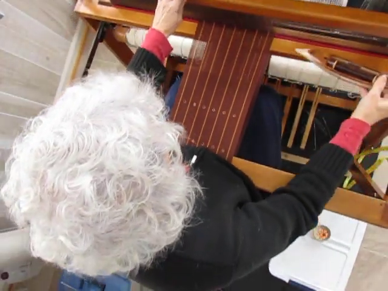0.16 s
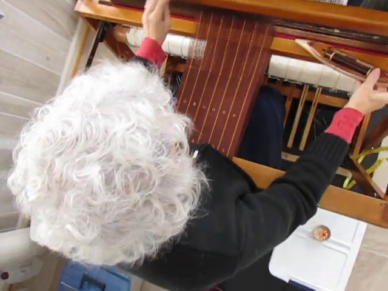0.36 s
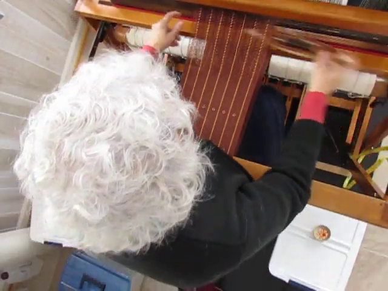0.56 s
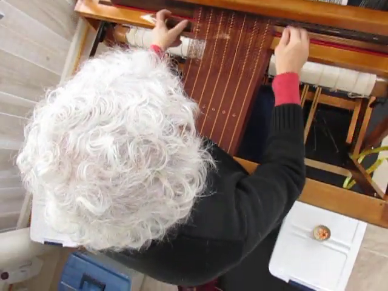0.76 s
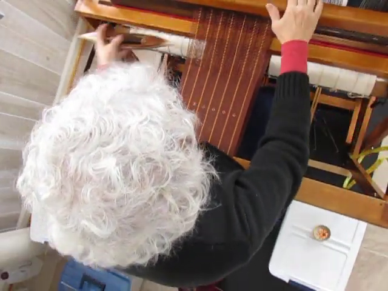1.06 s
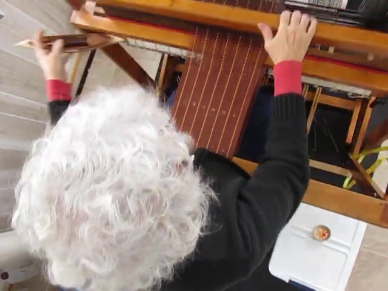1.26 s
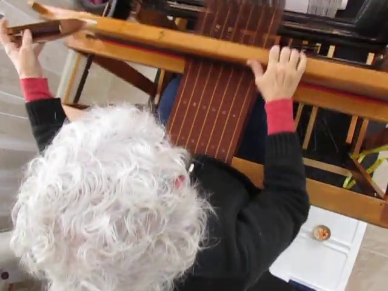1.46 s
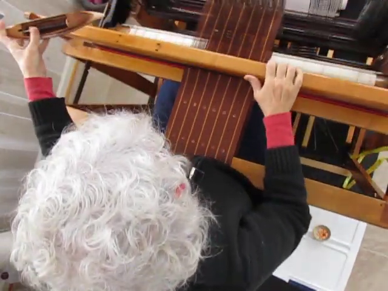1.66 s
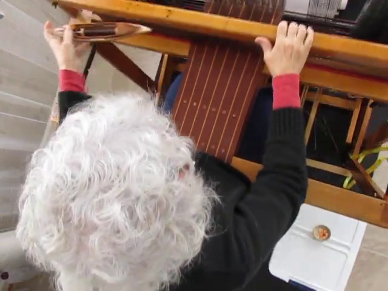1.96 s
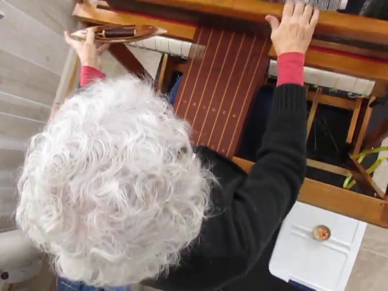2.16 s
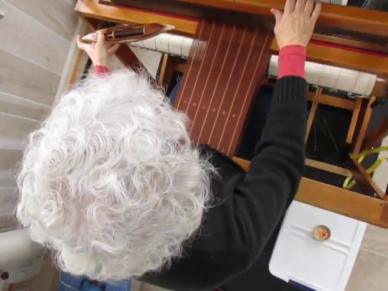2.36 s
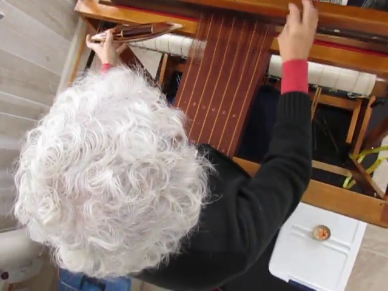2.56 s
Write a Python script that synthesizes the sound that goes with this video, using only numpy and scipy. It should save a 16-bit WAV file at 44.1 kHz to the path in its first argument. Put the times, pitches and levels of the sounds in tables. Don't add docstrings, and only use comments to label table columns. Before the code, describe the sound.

A wooden hand loom, close in stereo, in a small furnished room. Soft rubbing and light clacks at 0.2-0.3 s; the shuttle strikes sharply at 0.48 and its bobbin rattles until 0.8, moving right to left. After a brief lull, hard bright knocks at 1.07-1.45. Thuds and thread hiss around 1.5-1.9, scattered clacks, then loud shaft clatter at 2.3-2.4 with a thin high squeal until 2.6.

```python
import sys
import numpy as np
from scipy import signal
from scipy.fft import rfft, irfft
from scipy.io import wavfile
from scipy.ndimage import uniform_filter1d

SR = 44100
rng = np.random.default_rng(int(sys.argv[2]) if len(sys.argv) > 2 else 0)


def log_audio(samples):
    frames = np.atleast_2d(samples).T
    limited = np.clip(frames, -1, 1)
    pcm = np.round(limited * 32767).astype(np.int16)
    wavfile.write(sys.argv[1], SR, pcm)


def gain_from_db(level_db):
    decades = np.asarray(level_db, float) / 20
    return 10 ** decades


N = 119070
RING = 8000

# f/Hz, likeness (1 = identical)
LIKENESS = [(60, 0.88), (300, 0.92), (2000, 0.18), (8000, 0.018)]
# t/s, peak level/dB, tilt/(dB per octave), favoured f/Hz
BOBBIN_KNOCKS = [(0.511, -15, -8.5, 4410), (.6590, -12, -5, 8040), (0.67, -7.5, -6.5, 5560),
                 (.6770, -7.5, -1, 8300), (0.7055, -11, -15, 1850), (0.7081, -6.5, 1.5, 11800),
                 (0.712, -4.5, 3.5, 5800), (0.72, -12.5, -1.5, 2700), (0.7469, -8.5, 8.5, 6010),
                 (0.749, -10.5, 0, 2400), (0.7733, -12.5, 0.5, 2660), (.7820, -13, 3.5, 6100),
                 (1.0972, -11, 1, 3520), (1.1100, -16, -2, 8400), (1.1160, -11, 1, 4940),
                 (1.139, -7, -6.5, 2420), (1.1490, -25, -4.5, 2400), (1.1950, -13.5, -0.5, 4960),
                 (1.2060, -13, -1.5, 2340), (1.2420, -18.5, -7, 2360), (1.262, -17.5, 1.5, 5100),
                 (1.3295, -13, 2, 3400), (1.333, -11.5, 7, 4900), (1.3410, -13, -5, 2480),
                 (1.348, -11.5, 0, 5030), (1.358, -14, -3, 3360), (1.368, -16, -0.5, 3450)]
# t/s, peak level/dB, tilt/(dB per octave), favoured f/Hz
BOAT_STRIKES = [
    (0.4838, -4.5, -11.5, 2500),
    (1.0590, -31.5, -5, 2510),
    (1.065, -29.5, -8, 3000),
    (1.0741, -5, -5, 3660),
    (1.1338, -6.5, -8, 2500),
    (1.1658, -4.5, -2, 2410),
    (1.268, -12.5, -6, 2700),
    (1.3060, -8.5, -5, 2640),
    (1.4372, -11.5, -14, 2760),
]


def evened(x):
    return x / np.sqrt(np.mean(x ** 2) + 1e-20)


def read(points, hz):
    f, value = np.transpose(points)
    return np.interp(np.log(hz + 1), np.log(f + 1), value)


def curve(points, axis=1):
    p = np.array(points)
    return np.interp(np.arange(N) / SR, p[:, 0], p[:, axis])


def add(mix, s, sound):
    part = mix[..., round(s * SR):][..., :sound.shape[-1]]
    part += sound[..., :part.shape[-1]]


def second_side(left, other, hz):
    same = np.clip(read(LIKENESS, hz), -1, 1)
    same = same.reshape(-1, *[1] * (left.ndim - 1))
    return same * left + np.sqrt(1 - same ** 2) * other


def wobble(rate_hz):
    b, a = signal.butter(2, rate_hz, fs=SR)
    drift = signal.lfilter(b, a, rng.standard_normal(N + SR))[SR:]
    return 2 * np.tanh(0.5 * evened(drift))


def hiss(colour, patchy_db, grain_db, grains_per_s):
    size = 4096 if colour[-1][0] < 400 else 512
    frames, hz = N // (size // 4) + 5, np.fft.rfftfreq(size, 1 / SR)
    a, b, c, d, patches = rng.standard_normal((frames, len(hz), 5)).T
    patches = uniform_filter1d(patches, size=10, axis=0)
    patches = evened(uniform_filter1d(patches, size=8, axis=1))
    left = a + 1j * b
    z = np.array([left, second_side(left, c + 1j * d, hz)])
    above = np.maximum(hz / colour[-1][0], 1)
    below = np.maximum(colour[0][0] / (hz + 1), 1)
    shape = read(colour, hz) - 12 * np.log2(above * below)
    z *= gain_from_db(shape[:, None] + patchy_db * patches)
    x = signal.istft(z, nperseg=size, noverlap=size * 3 // 4)[1][:, :N]
    return evened(x * gain_from_db(grain_db * wobble(grains_per_s)))


def room_tone():
    # f/Hz, level/dB
    hush_colour = [(145, 5.5), (200, -18.5), (1200, -22.5), (15000, -26.5)]
    return gain_from_db(-54) * hiss(hush_colour, patchy_db=1.2, grain_db=0.6, grains_per_s=30)


def reed():
    # t/s, level/dB
    slide = [(0, -35), (.12, -34), (.19, -39), (.4, -44.5), (.45, -31.5), (.64, -43.5), (.85, -80),
             (1.06, -64), (1.2, -36), (1.5, -34), (1.6, -17.5), (1.69, -29), (1.78, -23), (1.87, -38.5),
             (1.96, -27.5), (2.03, -36.5), (2.07, -30.5), (2.5, -44)]
    # f/Hz, level/dB
    slide_colour = [(1500, -16), (4500, -11.5), (11000, -3), (16000, -11.5)]
    sound = hiss(slide_colour, patchy_db=2.5, grain_db=1.0, grains_per_s=210)
    return gain_from_db([[1], [-1]]) * gain_from_db(curve(slide)) * sound


def cords():
    # t/s, level/dB
    rubbing = [(0, -42.5), (.19, -51), (.23, -31), (.41, -44), (.8, -36.5), (.95, -55.5), (1.06, -72),
               (1.1, -49.5), (1.6, -31), (1.9, -45), (2, -32.5), (2.25, -45.5), (2.36, -28), (2.55, -45.5)]
    # f/Hz, level/dB
    rub_colour = [(600, -1.5), (1500, 2), (6500, -7.5)]
    return gain_from_db(curve(rubbing)) * hiss(rub_colour, patchy_db=2.5, grain_db=2.5, grains_per_s=110)


def floor():
    # t/s, level/dB
    weight_on = [(0, -44.5), (.19, -46.5), (.27, -35), (.41, -41.5), (.48, -37.5), (.62, -46), (.69, -36.5),
                 (.8, -54), (.88, -58.5), (1.35, -49.5), (1.6, -30), (1.9, -48.5), (1.97, -37.5),
                 (2.24, -41), (2.31, -32.5), (2.5, -48.5)]
    # f/Hz, level/dB
    floor_colour = [(30, -1.5), (70, -2), (140, -6.5), (190, -17), (340, -11.5)]
    return gain_from_db(curve(weight_on)) * hiss(floor_colour, patchy_db=1.5, grain_db=2.5, grains_per_s=16.5)


def squeaks():
    # start t/s, length/s, level/dB, f/Hz
    whistles = [(0.033, 0.052, -47.5, 2090), (1.581, .03, -30.5, 5380), (1.584, 0.094, -30.5, 4630),
                (1.664, .03, -33, 4550), (.512, 0.052, -38, 13400), (.612, 0.051, -41, 10750),
                (1.66, 0.019, -34, 6800), (1.703, 0.072, -39, 7350), (2.056, 0.037, -28.5, 8750),
                (2.212, 0.035, -36, 3730), (2.217, 0.049, -33, 7480), (2.466, 0.09, -32, 8400),
                (2.608, 0.043, -38.5, 10140)]
    # t/s, f/Hz, level/dB
    squeal = [
        (2.295, 8549, -31),
        (2.36, 8480, -25.5),
        (2.425, 8630, -27),
        (2.452, 8580, -23),
        (2.47, 8630, -29.5),
        (2.6, 8780, -65),
    ]
    out, t = np.zeros(N), np.arange(N) / SR
    for s, length, db, hz in whistles:
        u = np.clip((t - s) / length, 0, 1)
        swell = np.sin(np.pi * u ** 0.27) ** 2.0
        turns = np.cumsum(hz + 60 * wobble(126)) / SR
        out += gain_from_db(db + 9.1 * wobble(105)) * swell * np.sin(2 * np.pi * turns)
    on = uniform_filter1d(1.0 * ((t > squeal[0][0]) & (t < squeal[-1][0])), size=400)
    turns = np.cumsum(curve(squeal) + 25 * wobble(54)) / SR
    level_db = curve(squeal, axis=2) + 3 * wobble(86) - 0.5
    out += on * gain_from_db(level_db) * np.sin(2 * np.pi * turns)
    return out * gain_from_db([[1.5], [-1.5]])


def knock(modes, chatter_s, colour, ring_s, puff_s, bounce, tick_db, puff_db):
    t, hz = np.arange(RING) / SR, np.fft.rfftfreq(2 * RING, 1 / SR)
    f, db = np.transpose(modes * 4)[:, :, None]
    luck = rng.standard_normal((2, len(f), 1))
    fade_db = 60 * t / ring_s * (f / 1000) ** 0.2
    ring = gain_from_db(db + 2 * luck[0] - fade_db) * np.sin(2 * np.pi * f * (1 + 0.013 * luck[1]) * t)
    ring = ring.reshape(2, -1, RING).sum(1)
    ring = ring + gain_from_db(puff_db - 60 * t / puff_s) * rng.standard_normal((2, RING))
    left, other = rfft(ring, 2 * RING)
    pair = np.array([left, second_side(left, other, hz)]) + gain_from_db(tick_db)
    u = t / max(chatter_s, 1e-4)
    blow = rng.standard_normal(RING) * (rng.random(RING) < 0.05) * u * np.exp(-u) * bounce
    blow[0] = 1
    log_gain = np.log(gain_from_db(np.maximum(colour(hz + 20), -80)))
    mirrored = np.r_[log_gain, log_gain[-2:0:-1]]
    causal = np.exp(np.conj(signal.hilbert(mirrored)))[:RING + 1]
    x = irfft(pair * rfft(blow, 2 * RING) * causal)[:, :RING]
    return x / abs(x.mean(0)).max()


def frame():
    # t/s, peak level/dB, tilt/(dB per octave)
    thuds = [(0.038, -29, -9), (0.429, -33, 0.5), (0.436, -21.5, -5), (.445, -27.5, -0.5), (0.468, -56, 3),
             (0.666, -20, 5.5), (1.281, -25, -13.5), (1.411, -19, -0.5), (1.522, -15.5, -1),
             (1.547, -20, -1), (1.602, -25, 2.5), (1.65, -26, -6), (1.731, -29, -1.5), (1.954, -28.5, -7),
             (2.179, -35, -4.5), (2.285, -44, 5), (2.687, -25.5, -5)]
    # f/Hz, level/dB
    timber = [(290, 11.5), (350, 3), (515, 9.5), (800, 8), (1070, -3.5)]
    out = np.zeros((2, N))
    for s, db, tilt_db in thuds:
        def colour(hz):
            tilt = tilt_db * np.log2(np.maximum(hz / 300, 1))
            soft = 18 * np.maximum(np.log2(hz / 1700), 0)
            return tilt - soft - 40 * np.maximum(np.log2(275 / hz), 0)
        blow = knock(timber, 0.016, colour, 0.029, 0.035, 0.62, tick_db=-24, puff_db=35.0)
        add(out, s, gain_from_db([[db + 0.51], [db - 0.8]]) * blow)
    return out


def shafts():
    # t/s, peak level/dB, centre f/Hz
    clacks = [(0.212, -13, 6000), (.288, -21.5, 4900), (1.469, -12, 10650), (1.755, -14.5, 4846),
              (1.775, -41, 9250), (1.872, -25.5, 3000), (1.877, -20.5, 11000), (1.952, -16, 3350),
              (2.085, -11, 13000), (2.2846, -19.5, 1950), (2.323, -5, 3730), (2.3562, -6.5, 6300),
              (2.3925, -14.5, 2123), (2.533, -33, 10300)]
    # f/Hz, level/dB
    bar_modes = [(1410, 9), (1720, 1), (2600, 4.5), (3849, 0.5), (6525, 8.5), (10910, -4)]
    out = np.zeros((2, N))
    for s, db, centre_hz in clacks:
        def colour(hz):
            peak = -4.5 * abs(np.log2(hz / centre_hz))
            bass_cut = 15 * np.maximum(np.log2(1100 / hz), 0)
            return peak - bass_cut - 50 * np.maximum(np.log2(hz / 13500), 0)
        blow = knock(bar_modes, 0.0043, colour, 0.042, 0.04, 0.3, tick_db=34, puff_db=21.5)
        add(out, s, gain_from_db(db) * blow)
    return out


def favour(hz, spot_hz):
    lift_db, width_octaves = 7.5, 0.1
    return lift_db * np.exp(-0.5 * (np.log2(hz / spot_hz) / width_octaves) ** 2)


def shuttle():
    # f/Hz, level/dB
    boat_modes = [(1180, 1.5), (1980, -8), (2495, -8), (2645, -2), (3410, -2.5), (4360, 1), (4910, 2.5),
                  (6010, 3), (8030, 0.5), (11970, 6)]
    # t/s, left minus right level/dB
    crossing = [(.48, -2), (1.1, 2.5)]
    free_hz, held_hz, bobbin_hz = 1110, 1880, 1980
    out = np.zeros((2, N))

    def blow_colour(low_hz, tilt_db, spot_hz):
        def colour(hz):
            tilt = tilt_db * np.log2(np.maximum(hz / 2600, 1))
            bass_cut = 24 * np.maximum(np.log2(low_hz / hz), 0)
            top_cut = 60 * np.maximum(np.log2(hz / 12300), 0)
            return tilt - bass_cut - top_cut + favour(hz, spot_hz)
        return colour

    for s, db, tilt_db, hz in BOBBIN_KNOCKS:
        colour = blow_colour(bobbin_hz, tilt_db, hz)
        blow = knock(boat_modes, 0.0015, colour, 0.057, 0.012, 2.06, tick_db=-7, puff_db=23.5)
        add(out, s, gain_from_db(db) * blow)
    for s, db, tilt_db, hz in BOAT_STRIKES:
        colour = blow_colour(held_hz if s > 1 else free_hz, tilt_db, hz)
        blow = knock(boat_modes, 0.0004, colour, 0.15, 0.03, 0.5, tick_db=40, puff_db=26)
        add(out, s, gain_from_db(db) * blow)
    pan = curve(crossing)
    return (out + spindle()) * gain_from_db([pan / 2, -pan / 2])


def spindle():
    # f/Hz, level/dB, t60/s
    pin_modes = [(512, -42, 0.65), (1180, -29.5, 0.34), (2500, -35, 0.32), (2670, -28.5, 0.18),
                 (4410, -46, .15), (4970, -37.5, 0.13), (5970, -30.5, 0.17), (7955, -25.5, 0.12),
                 (11955, -52, 0.055)]
    twin, split = 0.5, 0.01115
    grip_db = -7
    out, t = np.zeros((2, N)), np.arange(3 * RING) / SR
    f, mode_db, t60 = np.transpose(pin_modes)[:, :, None]
    pair = np.exp(2j * np.pi * f * t) + twin * np.exp(2j * np.pi * f * (1 + split) * t)
    tones = gain_from_db(mode_db - 60 * t / t60) * pair * np.minimum(t / 0.0025, 1)
    for s, db, tilt_db, hz in BOBBIN_KNOCKS + BOAT_STRIKES:
        held = s > 1
        luck_db = 2.3 * rng.standard_normal(f.shape)
        weight = gain_from_db(db + favour(f, hz) + grip_db * held + luck_db).T
        weight[0, :2] *= (1, gain_from_db(grip_db)) if held else (0, 1)
        spread = 0.58 * (1 - read(LIKENESS, f.T))
        turn = 2 * np.pi * rng.random(len(f)) + rng.standard_normal((2, len(f))) * spread
        add(out, s, ((weight * np.exp(1j * turn)) @ tones).real)
    return out


def room(x):
    # f/Hz, t60/s
    decay = [(300, 0.29), (3000, 0.36), (13000, 0.18)]
    taps = np.zeros((2, SR))
    at = np.arange(60, SR - 20, 20) + rng.integers(0, 20, (2, (SR - 61) // 20))
    np.put_along_axis(taps, at, rng.choice([-1.0, 1.0], at.shape), 1)
    hz, t, z = signal.stft(taps, SR, nperseg=256)
    z[1] = second_side(z[0], z[1], hz)
    tail = signal.istft(z * gain_from_db(-60 * t / read(decay, hz)[:, None]), SR, nperseg=256)[1]
    return signal.fftconvolve(x, tail / np.linalg.norm(tail[0]), axes=1)[:, :N]


def scene():
    whistle, wood, bars, boat = squeaks(), frame(), shafts(), shuttle()
    echo = room(gain_from_db(-4.0) * boat + gain_from_db(-6.0) * bars + gain_from_db(-8) * wood + gain_from_db(-1) * whistle)
    close = boat + bars + wood + whistle
    return close + echo + reed() + cords() + floor() + room_tone()


def band_limit(x):
    return signal.sosfilt(signal.butter(12, 16170, fs=SR, output="sos"), x)


def record(dry):
    hz = np.fft.rfftfreq(N, 1 / SR)
    top_db = -22 * np.maximum(np.log2(hz / 12000 + 1e-9), 0)
    top_db -= 80 * (hz > 16150)
    clipped = np.clip(dry, -0.96, 0.96)
    mix = irfft(rfft(clipped) * gain_from_db(top_db), N)
    return band_limit(mix)


dry = scene()
out = record(dry)
log_audio(out)
```